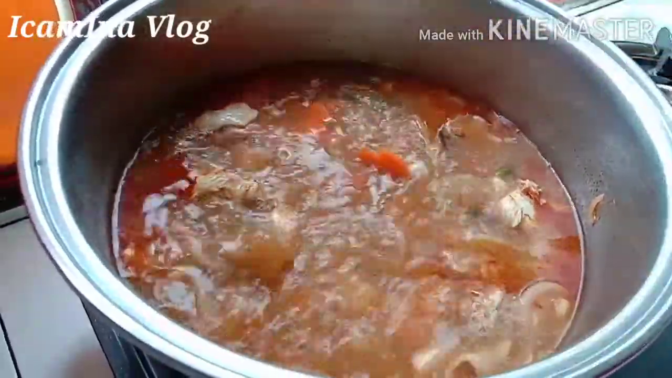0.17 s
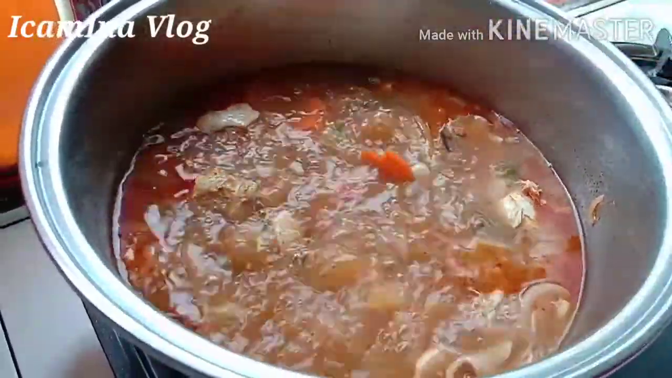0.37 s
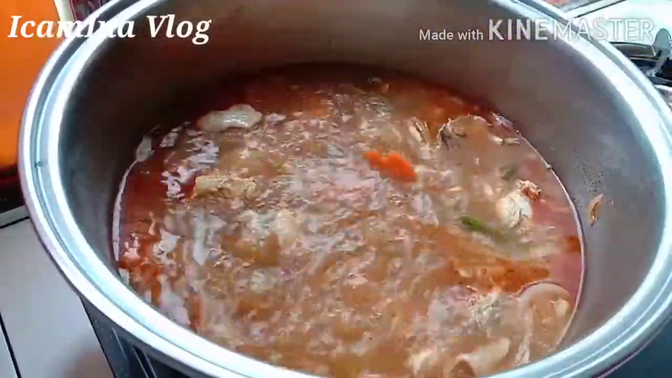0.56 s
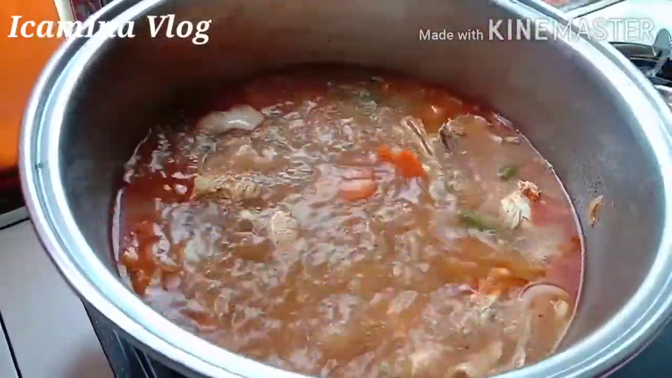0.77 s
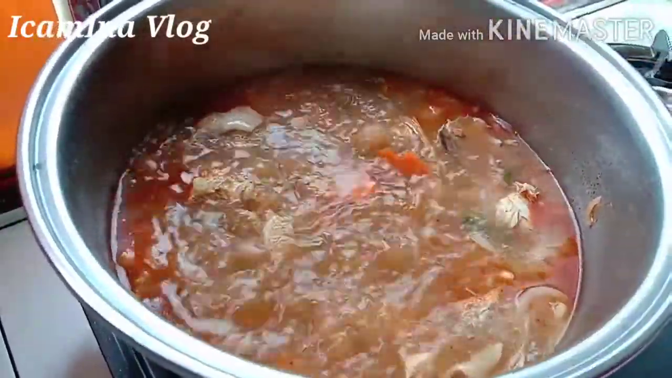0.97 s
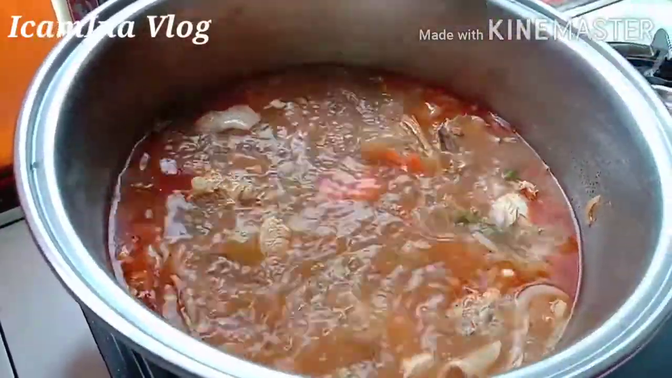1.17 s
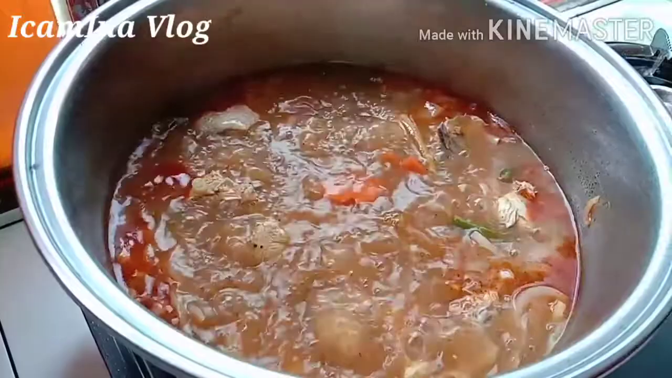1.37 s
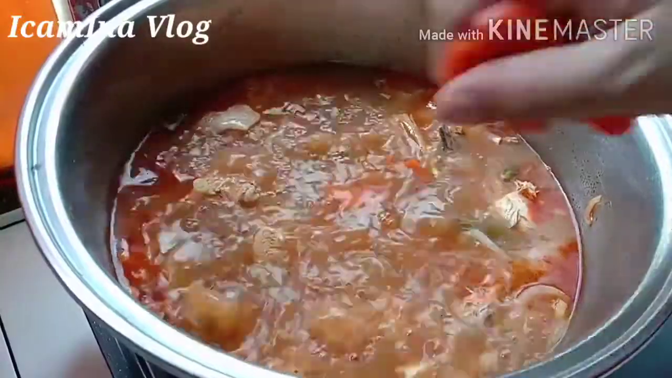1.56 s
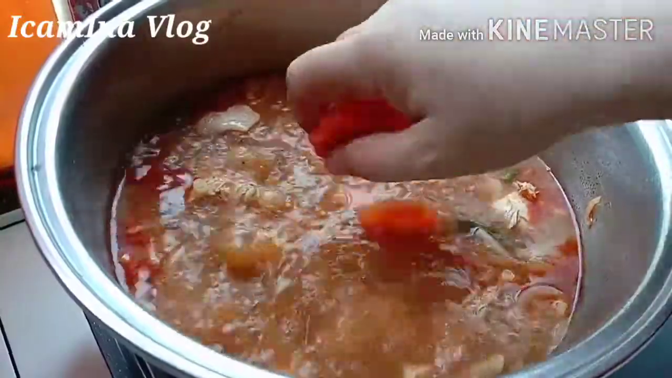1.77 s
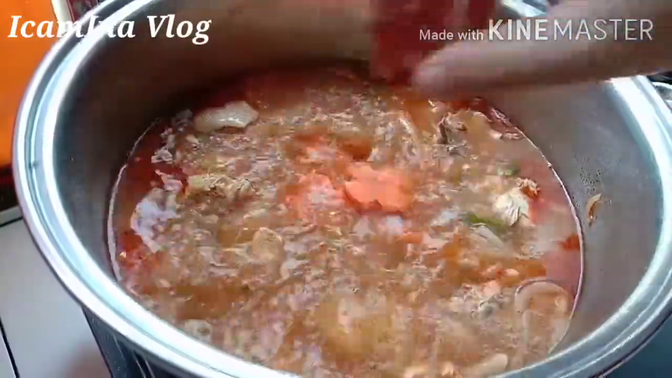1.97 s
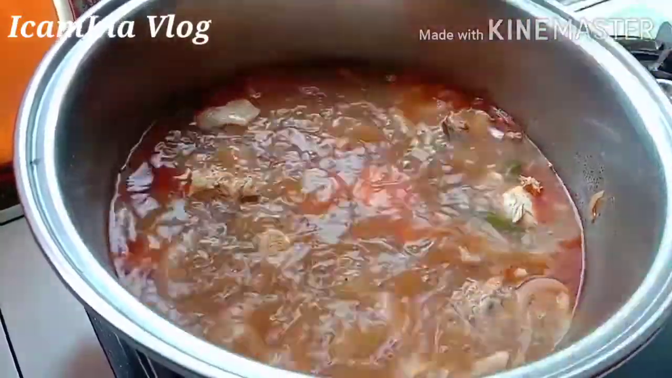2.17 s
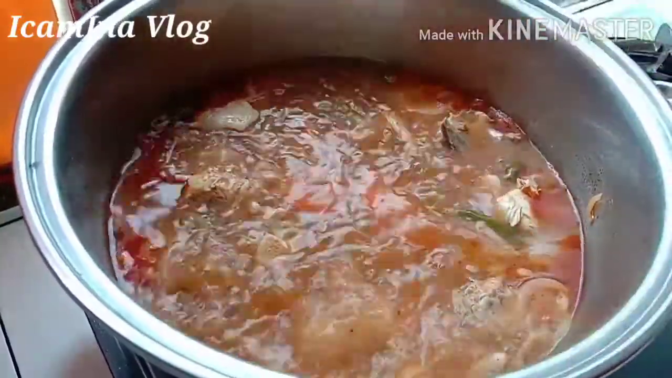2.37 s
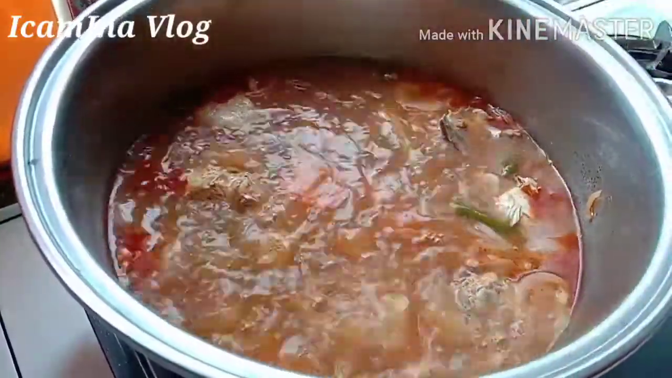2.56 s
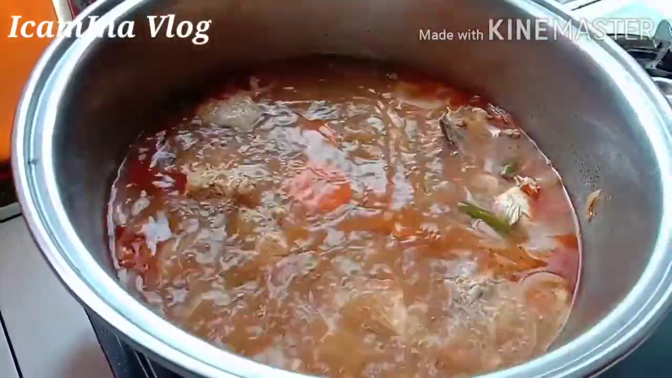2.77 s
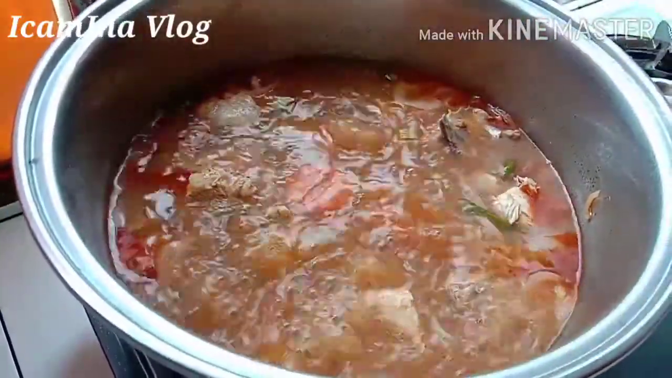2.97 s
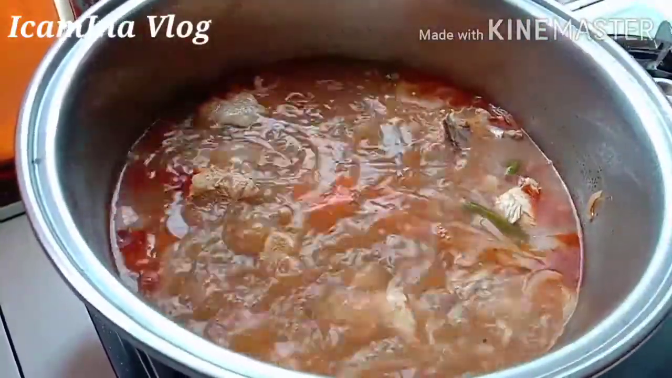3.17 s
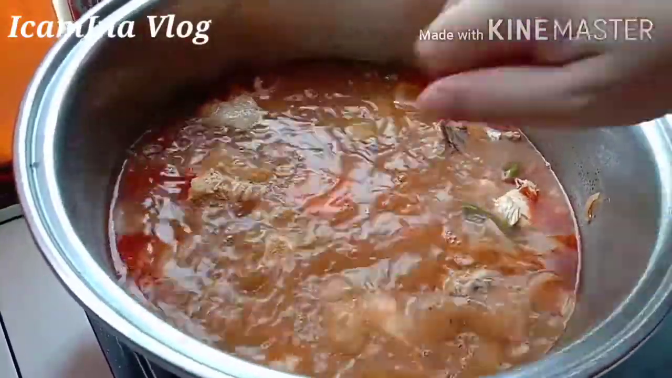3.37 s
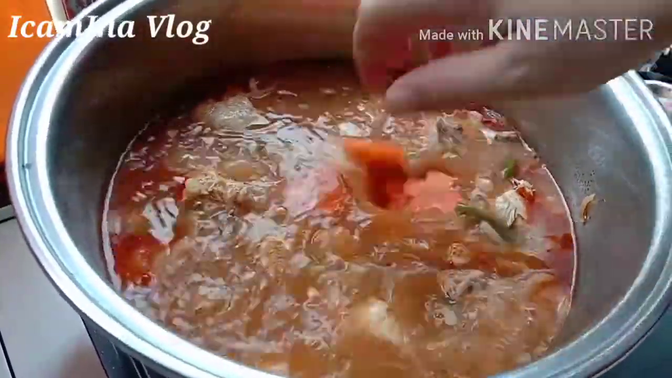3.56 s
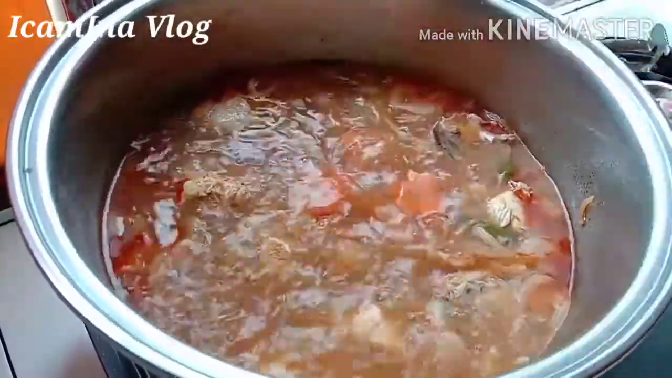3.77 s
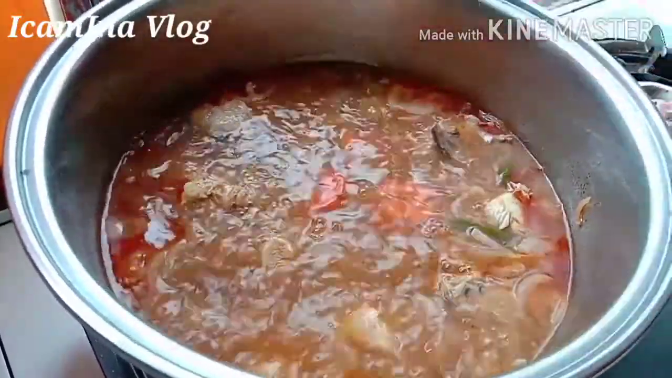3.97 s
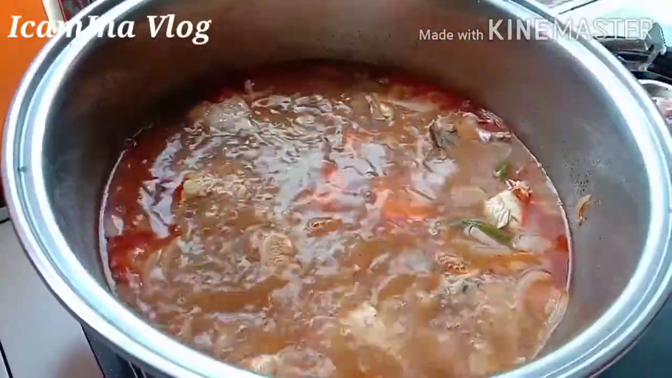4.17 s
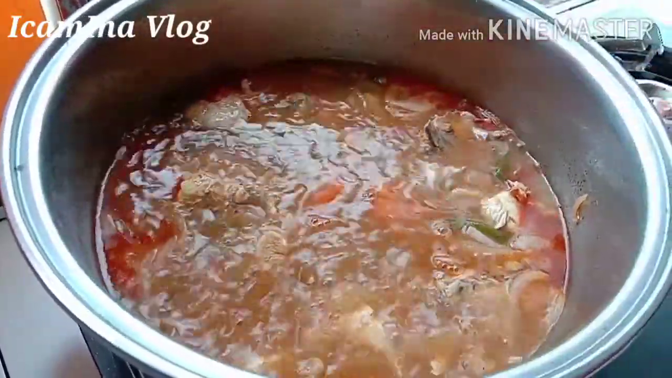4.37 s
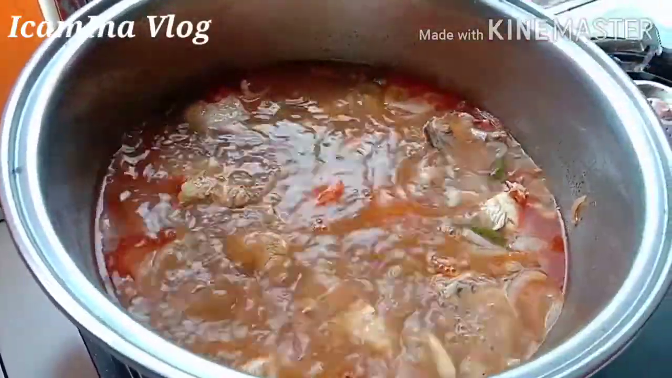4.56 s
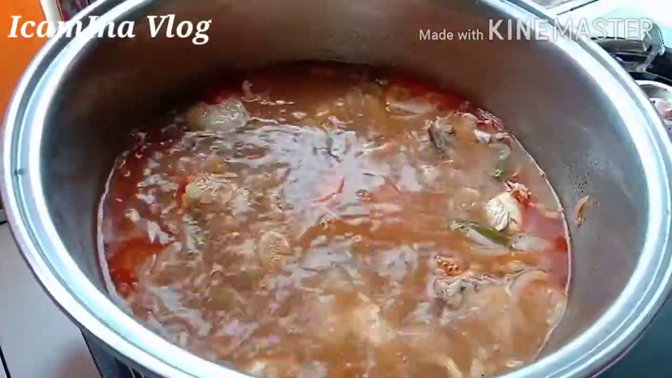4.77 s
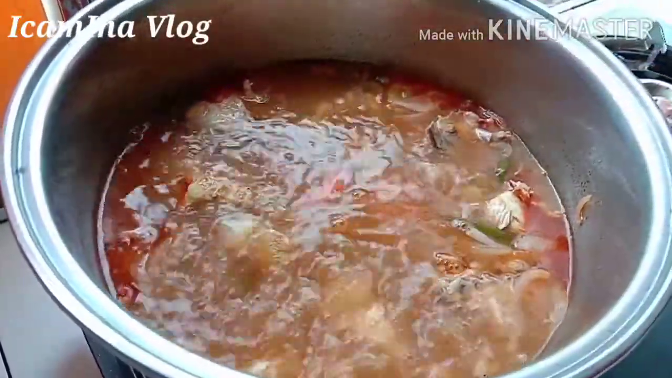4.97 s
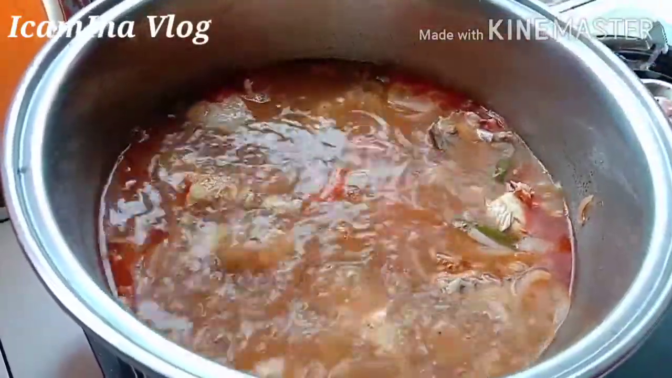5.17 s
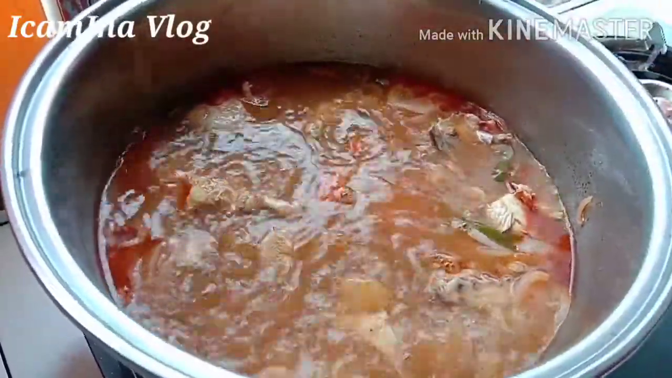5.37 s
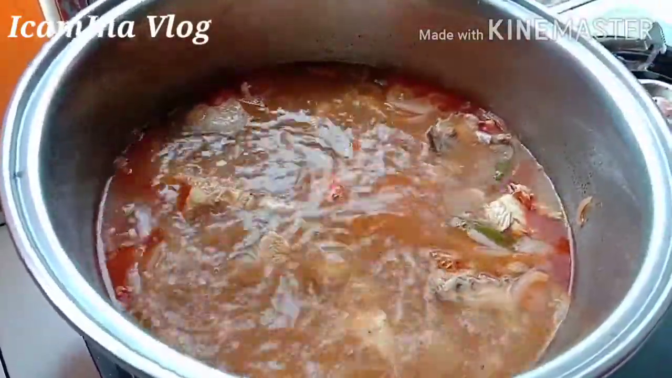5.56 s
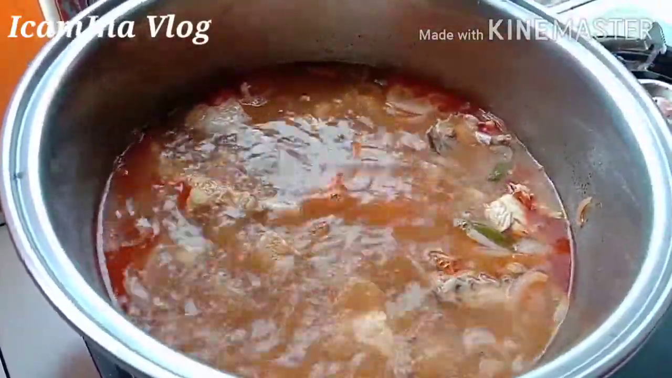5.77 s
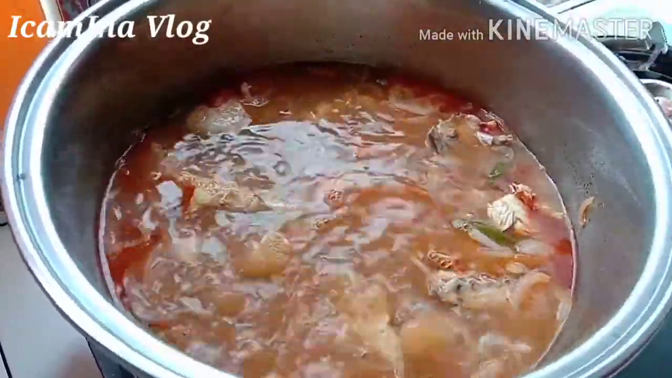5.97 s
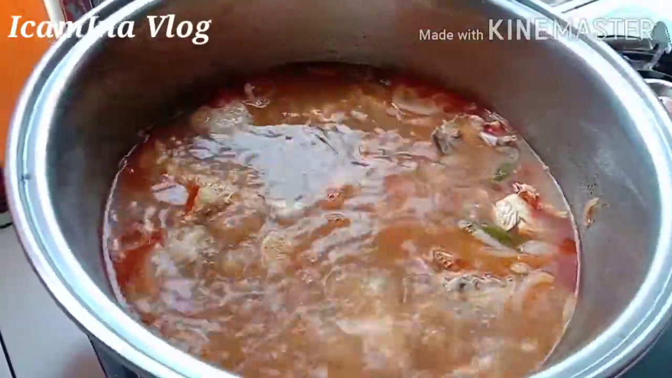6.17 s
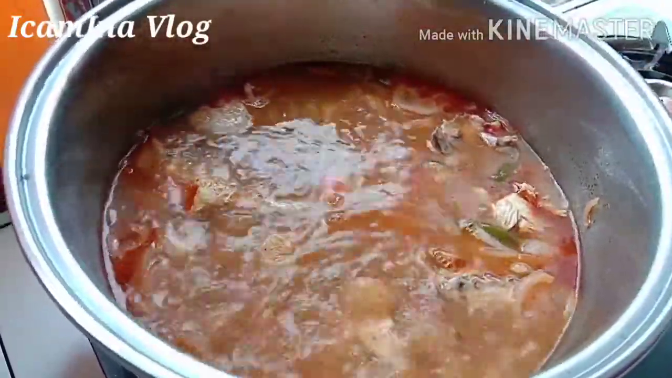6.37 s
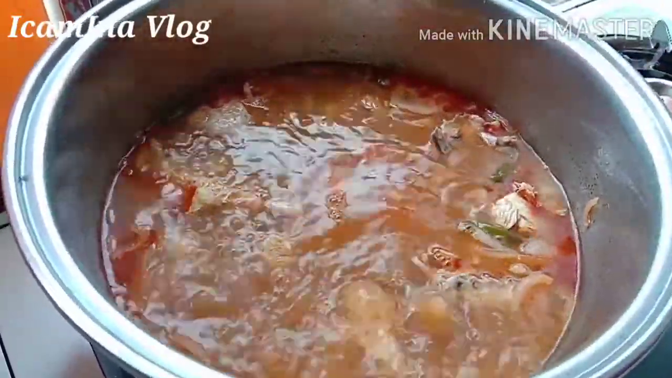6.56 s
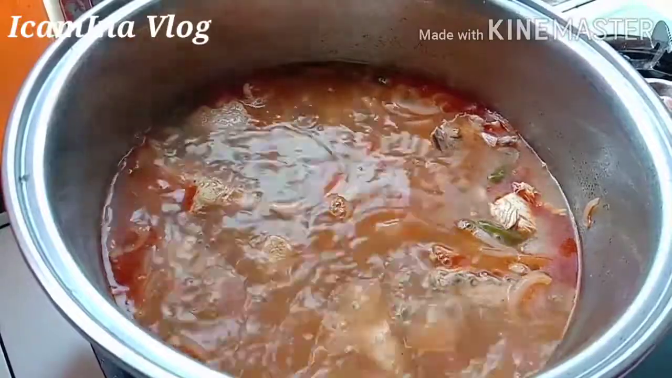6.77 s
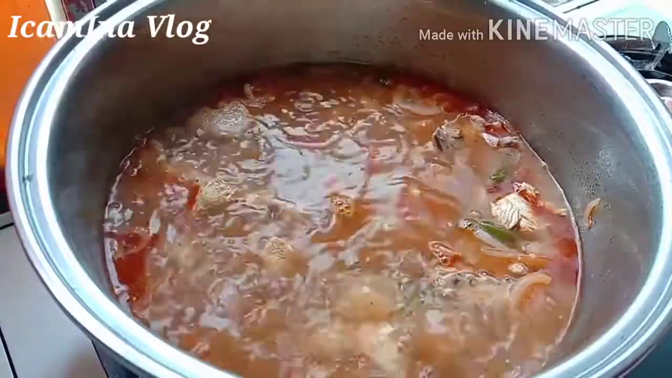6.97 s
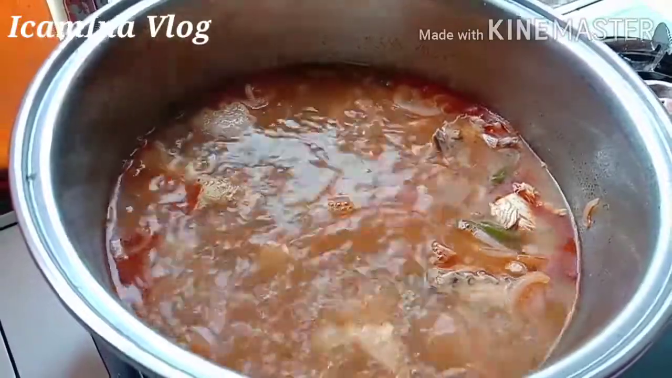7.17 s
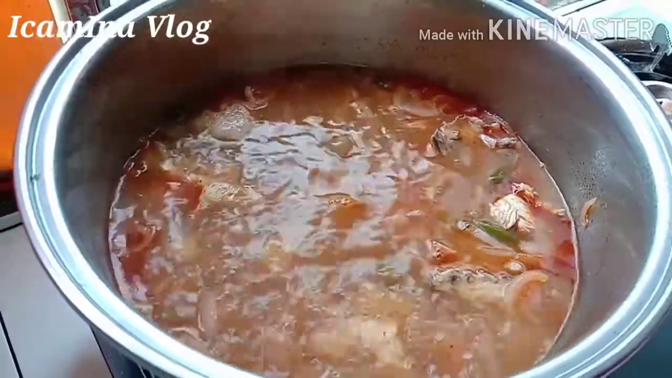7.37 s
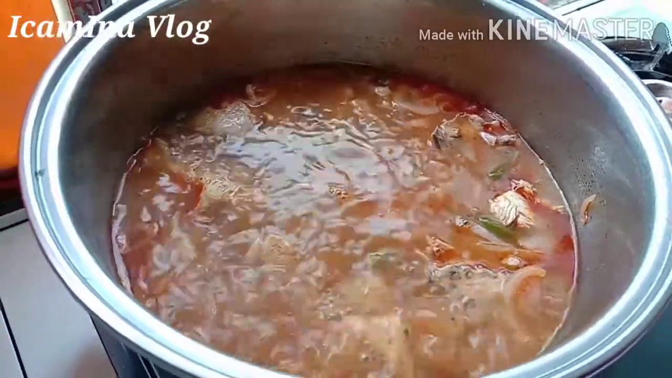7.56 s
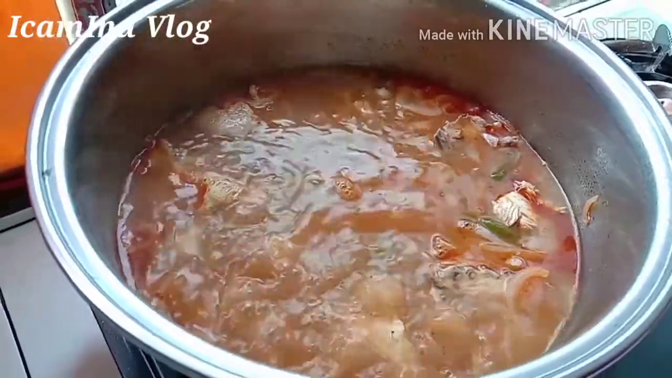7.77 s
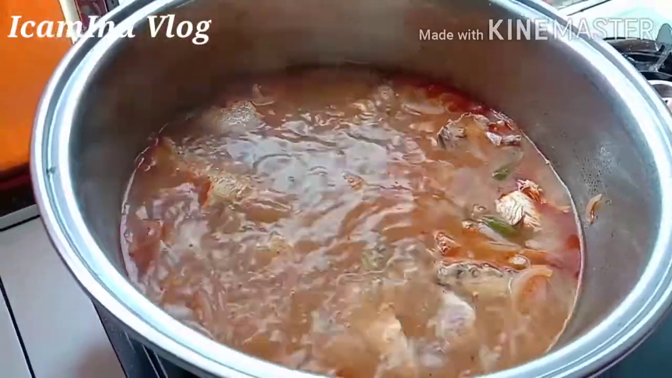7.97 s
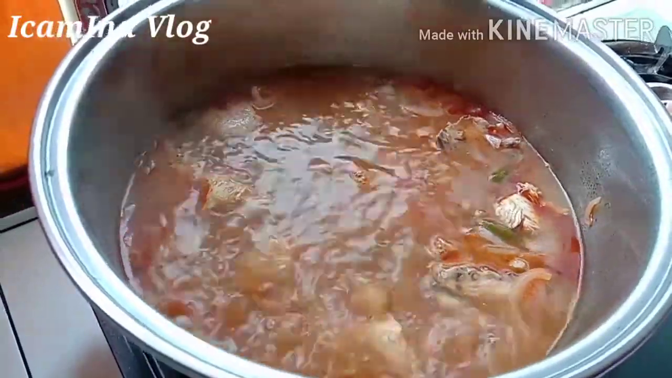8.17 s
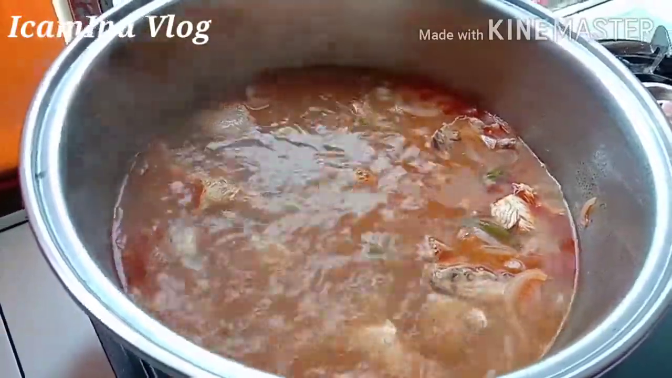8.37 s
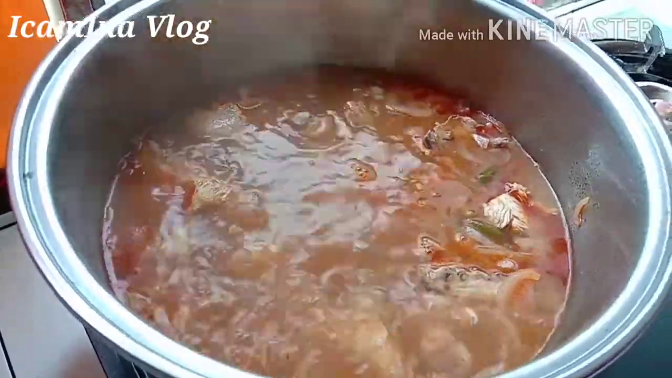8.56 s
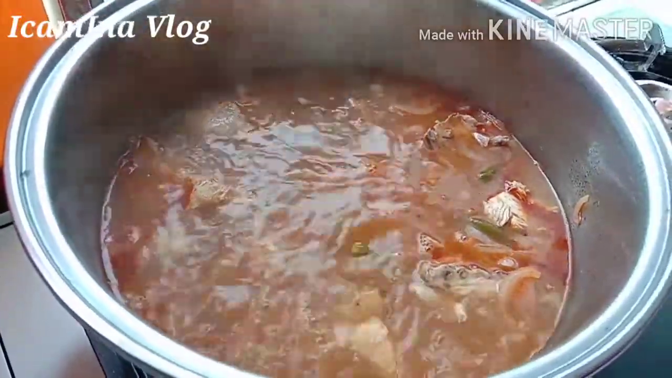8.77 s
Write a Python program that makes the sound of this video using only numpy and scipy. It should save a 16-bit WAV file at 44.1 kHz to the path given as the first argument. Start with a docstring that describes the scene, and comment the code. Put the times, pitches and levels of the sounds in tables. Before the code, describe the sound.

A big steel pot of broth boils without pause, close to the microphone in a small kitchen: low gurgles, a dense midrange simmer and fine crackling fizz. A handful of vegetable slices slaps and plops in, then a smaller one. Later a dish touches the worktop lightly, then lands with a loud hard clunk that rings briefly in the room. A tiny dry rustle comes near the end. Almost mono.

```python
"""Broth on the boil

Broth boils in a steel pot in a small kitchen: steam pockets collapse on the bottom as filtered clicks,
big bubbles gurgle up as rising rings over low noise, and tiny ones fizz and ping at the surface.
Two handfuls of vegetable slices plop in, each a noise slap with a ringing bubble; later, grains rustle briefly.
A dish lands on the worktop, lightly and then heavily: a noise blow, ringing modes and the room's answer.
The sound is almost mono."""
import sys
import numpy as np
from scipy import signal
from scipy.fft import rfft, irfft, next_fast_len
from scipy.io import wavfile
from scipy.ndimage import uniform_filter1d, map_coordinates

SR = 44100
rng = np.random.default_rng(int(sys.argv[2]) if len(sys.argv) > 2 else 0)


def wav_record(signal):
    """Record a signal, one row per channel, as 16-bit PCM in the file named by sys.argv[1]."""
    frames = np.transpose(np.atleast_2d(signal))
    bounded = np.clip(frames, -1, 1)
    # unit amplitude maps onto the largest positive 16-bit level
    quanta = np.round(bounded * 32767).astype(np.int16)
    wavfile.write(sys.argv[1], SR, quanta)


N = 388962  # length in samples

# Boil: slow level moves.
# strength of the collapses on the pot's bottom: start_s, level_db
SEETHE_LEVEL = [(0, -49.5), (2.15, -48.5), (2.7, -48.5), (3.3, -49.5), (3.8, -49), (4.2, -48.5), (5.3, -47),
                (6.7, -47), (8.8, -48.5)]
# surface sizzle, before its overall gain: start_s, level_db
SIZZLE_LEVEL = [(0.0, -57.5), (0.33, -60), (1.81, -59), (2.02, -58), (2.88, -61), (7.02, -60), (7.5, -62),
                (8.55, -59.5)]
# finest fizz, which thins out and returns: start_s, level_db
FIZZ_LEVEL = [(0, -66), (1.7, -63.5), (6.1, -68.5), (7.8, -69), (8.5, -65.5)]
# each handful shifts the fizz for a moment: start_s, change_db
HANDFULS = [(1.87, 2.5), (3.63, -1)]
SETTLE_S = 0.45  # time constant of the return
GURGLE_DB, GURGLE_DB_PER_S = -55.5, 0.11  # level at the start, and its climb

# Boil: spectra and resonances.
# rolling steam bubbles: frequency_hz, relative_db
GURGLE = [(20, -17), (38, -28), (48, -10), (60, -17.5), (90, -6.5), (140, -3.5), (180, -6.5), (320, -4.5),
          (450, -11), (900, -17.5), (2000, -84)]
# collapsing steam pockets: frequency_hz, relative_db
SEETHE = [(100, -32), (300, -22.5), (470, -12), (750, -8.5), (950, -9), (1150, -2), (1500, -5),
          (1850, -4.5), (2200, -10), (3000, -19), (4200, -31), (8000, -56), (16000, -69)]
# films bursting on the surface: frequency_hz, relative_db
SIZZLE = [(1500, -3.5), (3300, -3), (4400, -8), (4900, 3), (5400, 4), (6200, -7), (6550, 4.5), (6950, -3.5),
          (7650, 2), (8200, -15), (9400, -20), (12000, -17), (13900, -17), (15300, -8)]
# finest pinging bubbles: frequency_hz, relative_db
PING_BAND = [(3000, -50), (6000, 2), (7500, -15.5), (9300, 3), (10600, 2), (12000, -2.5), (14000, -32)]
# resonances of the pot and its air: frequency_hz, width_hz, lift_db
POT = [(620.4, 52, 4.5), (850, 35, 1), (1266.6, 100, 11.5), (1731, 34, 5), (1781, 22, 5.5)]

# Steam domes and single bubbles.
# big domes that glug one by one: peak_s, peak_db, pitch_hz
GULPS = [(0.08, -45.5, 106.5), (0.39, -52, 118), (0.46, -52, 111), (1.04, -44, 108), (1.2, -49, 304),
         (1.61, -49, 316), (1.73, -48, 151), (1.74, -53, 311), (1.95, -49, 97), (2.0, -51, 107),
         (2.19, -46, 117), (2.21, -52, 310.6), (2.31, -50.5, 319), (2.33, -48.5, 113), (2.43, -47, 305),
         (2.66, -51, 134), (2.73, -49.5, 320), (2.91, -45, 308.6), (3.06, -52, 316), (3.11, -53.5, 610),
         (3.62, -51, 118), (3.95, -46, 210), (4.44, -52, 140), (4.78, -50, 312), (5.32, -51, 112),
         (6.2, -48.5, 318), (6.44, -49, 308), (6.65, -49, 317), (6.77, -48, 312), (6.89, -50, 307),
         (7.02, -47, 320), (7.1, -45, 308.5), (7.31, -51, 146), (7.39, -48, 208.4), (7.45, -49.5, 315),
         (7.6, -47, 322), (7.73, -46.5, 129), (7.78, -44.5, 310.4), (7.99, -47, 316), (8.24, -48, 220),
         (8.4, -48.5, 111.5), (8.45, -49, 110), (8.5, -49.5, 219)]
# pitches that the lesser domes favour: pitch_hz, level_db, rate_per_s
DOME_TONES = [(112.3, -52.5, 1.5), (145, -56, 1.3), (208, -55.5, 1.5), (309.2, -54.5, 2.5),
              (605, -54, 0.96), (810, -53.5, 0.63)]
DOME_SPREAD_DB, DOME_DETUNE = 1.5, 0.02  # scatter of level, and of pitch as a fraction
# single bubbles that burst near the microphone: start_s, peak_db, pitch_hz
BURSTS = [(0.5235, -52, 8200), (0.5967, -36, 9900), (0.7218, -39, 7460), (0.917, -43, 7900),
          (1.364, -39, 10000), (1.6318, -37, 9910), (2.3665, -35, 9400), (2.6396, -37, 9700),
          (3.3139, -53, 6580), (3.992, -37, 9100), (4.3914, -36, 7500), (5.0694, -40, 9900),
          (5.772, -41, 9900), (6.162, -43, 7600), (8.1535, -37, 7170), (8.313, -39, 9600)]

# Vegetable slices. slices, and drops falling back after them, slap the broth: start_s, slap_db (before a shared
# lift), plop_db (relative), pitch_hz (trapped bubble), treble_edge_hz
SPLASHES = [(1.8699, -34, -5, 3590, 5500), (1.8725, -30, -9, 4560, 15000), (1.93, -36, -13, 4800, 15000),
            (1.945, -37, -1, 4560, 8000), (1.954, -37, -5, 4450, 7000), (2.0373, -28, -0.5, 3320, 15000),
            (2.0522, -35, -13, 6250, 8000), (2.3645, -41.5, -7, 5200, 14000),
            (3.631, -32.5, -7, 3840, 6000), (3.6378, -32, -2, 9400, 15000), (3.6578, -34, -8, 6800, 9500),
            (3.667, -34.5, 3, 5420, 9000), (4.022, -50, -4, 3950, 9000)]
# the slap on the surface: frequency_hz, relative_db
SLAP = [(300, -32), (2500, -47), (3400, -11), (4200, -18), (5100, 2.5), (6800, 5), (8200, 2), (9600, 0.5),
        (13000, -15), (15300, 7)]
# the steel wall's bright resonances: frequency_hz, width_hz, lift_db
WALL = [(3340, 180, 18), (3920, 180, 17), (4770, 800, 15.5)]
# the plop inside the pot: frequency_hz, relative_db
PLOP = [(100, -16), (400, -16), (800, -11), (1200, -11.5), (1900, -4), (2700, -10.5), (3500, -22),
        (5000, -14), (9000, -33), (16000, -58)]
TRAPPED_DB, TRAPPED_SHARE = -14, 0.55  # the trapped bubble follows only a share of the slap's dB

# Dish on the worktop.
# contacts: start_s, level_db (relative), room_db (relative), metal_db (relative), treble_edge_hz
KNOCKS = [(5.6776, -29, -7.5, -23.5, 3180), (5.805, -34.5, -10, -41, 1800), (5.837, -17, -1.5, -18.5, 7000)]
# the dull blow: frequency_hz, relative_db
DISH = [(40, -76), (62, -61), (95, -4.5), (200, -15.5), (400, -8), (560, -10), (800, -2.5), (1160, 1),
        (1500, -5), (1950, -5), (2600, -15), (3500, -30), (4400, -58), (12000, -77)]
# ringing modes heard after a knock, the low ones from the room: frequency_hz, relative_db, t60_s
KNOCK_MODES = [(206.5, -11.5, 0.59), (305, -13, 0.56), (363, -14, 0.75), (712, -8, 0.38), (850, -15, 0.67),
               (918, -11, 0.36), (1138, -8, 0.47), (1141, 1.5, 0.35), (1148, -1, 0.37), (1226, -1.5, 0.64),
               (1281, -1, 0.77), (1342, -7.5, 0.98), (1430, -8.5, 0.62), (1943, -7, 0.41),
               (2430, -25, 0.27), (2622, -22, .4)]
# thin metal that the knocks set ringing: frequency_hz, relative_db, t60_s
METAL = [(4940, -16.5, 0.52), (5360, -25, 0.45), (7090, -24, .25), (7504, 2, 0.37), (10230, -37, 0.41),
         (11180, -22, 0.24)]
CHATTER_S, CHATTER_DB, CHATTER_LOSS_DB = 0.013, 14.5, 8  # gap, first rebound, loss at each further one

# Small sounds beside the pot.
# short rustles: start_s, level_db (before a shared lift), resonance_hz
RUSTLES = [(8.612, -33, 5700), (8.649, -39, 5500), (8.673, -41, 4900), (8.686, -41, 5600),
           (8.731, -37.5, 5300), (8.743, -33, 5050)]
# crinkling grains: frequency_hz, relative_db
CRINKLE = [(200, -37), (800, -24), (1250, 5.5), (2200, -8.5), (3800, -10.5), (4700, -16), (5300, 1),
           (6200, -18), (7200, -6), (8300, -14.5), (9800, -11), (13000, -31), (15300, -20)]
RUSTLE_S = 0.018  # the bell-shaped swell peaks halfway through this
# air of the passing hand nudges the microphone: centre_s, level_db, length_s
PUFF = (1.646, -52, 0.036)

# Background and room.
# even hiss: frequency_hz, relative_db
HISS = [(4000, -21), (8200, -3), (9500, -11.5), (11000, -16), (12000, -22), (13500, -4), (14500, -6),
        (15300, 14)]
HISS_DB = -73.5
# the kitchen's decay: frequency_hz, t60_s
KITCHEN = [(100, 0.43), (300, 0.57), (700, 0.47), (1300, 0.7), (2500, 0.5), (10000, 0.31)]
# standing waves of the kitchen: frequency_hz, width_hz, lift_db
STANDING = [(103.1, 16.6, 4.5), (219.6, 3.5, 8), (314.6, 8.4, 9), (379, 24, 4)]
# level of the faint side signal that gives a little width: frequency_hz, side_db
WIDTH = [(30, -2), (70, -27), (130, -42.5), (300, -35), (900, -30.5), (1300, -47.5), (2400, -32.5),
         (4400, -29.5), (8100, -51), (13000, -18), (15000, -19)]
TOP_HZ = 15520  # nothing sounds above this


def boil(sizzle_gain_db=1.5):
    """The voices of the boil drift as the broth heats; each handful disturbs the fizz, and it settles again."""
    t = np.arange(N) / SR
    stir_db = sum(db * (t > s) * np.exp(-np.abs(t - s) / SETTLE_S) for s, db in HANDFULS)
    gurgle_db = GURGLE_DB + GURGLE_DB_PER_S * t
    seethe_db = np.interp(t, *np.transpose(SEETHE_LEVEL))
    sizzle_db = np.interp(t, *np.transpose(SIZZLE_LEVEL)) + sizzle_gain_db + 0.79 * wobble(14)
    fizz_db = np.interp(t, *np.transpose(FIZZ_LEVEL)) + stir_db
    low = amp(gurgle_db) * gurgle() + amp(seethe_db) * seethe()
    high = amp(sizzle_db) * sizzle() + amp(fizz_db) * fizz()
    return low + high


def seethe():
    """Countless steam pockets collapse on the hot bottom and ring the pot; small bubbles blip at the surface."""
    collapses = unit(clicks(per_second=5000, spread_db=1.5, length=N)) * amp(0.99 * wobble(15))
    rush = patchy(colour(collapses, SEETHE, POT), depth_db=1.1)
    blips = bubbles(count=380, pitch_hz=1860, octaves=0.45, cycles=119, rise=0.088, spread_db=0.0)
    blips = amp(-8.0) * unit(colour(blips, SEETHE))
    return unit(in_room(rush + blips, wet_db=-10))


def gurgle():
    """Steam bubbles roll through the broth and wake the room's low resonances."""
    blubs = bubbles(count=1800, pitch_hz=211.1, octaves=0.776, cycles=30.0, rise=0.36, spread_db=4.5)
    blubs = unit(colour(blubs, GURGLE))
    churn = amp(-3.5) * unit(colour(rng.standard_normal(N), GURGLE))
    flat = [(100, 0)]
    return unit(colour(blubs + churn, flat, STANDING))


def sizzle():
    """Films burst on the surface: a fine crackle, and swarms of tiny ringing bubbles."""
    crackle = colour(clicks(per_second=7000, spread_db=7.0, length=N), SIZZLE)
    crackle = patchy(crackle, depth_db=3.5)
    beads = bubbles(count=3000, pitch_hz=5790, octaves=0.303, cycles=253, rise=0.055, spread_db=-1.0)
    beads = amp(-3.5) * unit(colour(beads, SIZZLE))
    return unit(in_room(crackle + beads, wet_db=-10.0))


def fizz():
    """The finest bubbles ping in flurries."""
    pings = bubbles(count=4000, pitch_hz=9200, octaves=0.12, cycles=26, rise=0.034, spread_db=7.5)
    flurries = pings * amp(2.3 * wobble(18))
    return unit(in_room(colour(flurries, PING_BAND), wet_db=-2.5))


def gulps(swell_s=0.027, rise=0.014, waver=0.023):
    """Each big dome of steam swells, rings briefly at a wavering pitch and fades."""
    out, age = np.zeros(N), np.arange(SR // 4) / SR / swell_s
    envelope = (age * np.exp(1 - age)) ** 2  # peaks at age 1
    shape_change = waver * wobble(60)
    for s, db, hz in list(GULPS) + domes():
        start = min(int(s * SR), N - len(age))
        pitch = hz * (1 + rise * (age - 1) + shape_change[start:start + len(age)])
        ring = np.sin(2 * np.pi * np.cumsum(pitch) / SR)
        add(out, max(s - swell_s, 0), amp(db) * envelope * ring)
    return out


def domes():
    """Lesser domes of steam rise at random, each near a favoured pitch: rows of peak_s, peak_db, pitch_hz."""
    rows = []
    for hz, db, per_second in DOME_TONES:
        scatter = rng.standard_normal((64, 2))
        for s, (force, radius) in zip(chance_times(per_second), scatter):
            rows.append((s, db + DOME_SPREAD_DB * force, hz * (1 + DOME_DETUNE * radius)))
    return rows


def bursts(cycles=20, rise=0.04):
    """Now and then a single tiny bubble pings close to the microphone."""
    out, t = np.zeros(N), np.arange(SR // 100) / SR
    for s, db, hz in BURSTS:
        ring = ping(t * hz / cycles, cycles, rise)
        add(out, s, amp(db) * ring / np.abs(ring).max())
    return in_room(out, wet_db=-19)


def splashes(slap_t60=0.011, spray_t60=0.063, spray_db=-17, plop_t60=0.16, cycles=50, rise=0.084):
    """Each slice or falling drop slaps the surface, traps a ringing bubble, throws a little spray and plops
    inside the pot."""
    out, t = np.zeros(N), np.arange(SR // 4) / SR
    for s, db, plop_db, hz, edge_hz in SPLASHES:
        slap = rng.standard_normal(len(t)) * amp(-60 * t / slap_t60) * (1 - np.exp(-t / 0.00078))
        droplets = unit(clicks(per_second=1500, spread_db=3, length=len(t)))
        spray = droplets * amp(spray_db - 60 * t / spray_t60)
        wet = dull(colour(slap + spray, SLAP, WALL), edge_hz)
        plop_noise = rng.standard_normal(len(t)) * amp(-60 * t / plop_t60)
        plop = amp(plop_db) * colour(plop_noise, PLOP, POT)
        bubble = amp(TRAPPED_DB + TRAPPED_SHARE * db) * ping(t * hz / cycles, cycles, rise)
        add(out, s, amp(db + 2.5) * (wet + plop) + bubble)
    return in_room(out, wet_db=-9.5)


def knocks(blow_t60=0.05, shiver_db=3, buzz_db=2, metal_rise_s=0.016):
    """A dull, chattering blow, ringing modes and a thin, shivering metal ring; walls draw the blow out."""
    out, t = np.zeros(N), np.arange(SR) / SR
    for s, db, room_db, metal_db, edge_hz in KNOCKS:
        blow = rng.standard_normal(len(t)) * amp(2.5 - 60 * t / blow_t60)
        blow[0] += amp(12)  # the first contact is one sharp push
        for k in range(3):  # the dish chatters as it lands
            blow[int((k + 1) * CHATTER_S * SR)] += amp(CHATTER_DB - CHATTER_LOSS_DB * k)
        walls = amp(room_db) * tail(len(t)) * (1 - np.exp(-t / 0.02))
        thud = amp(11.5) * dull(colour(blow + walls, DISH, STANDING), edge_hz)
        ringing = amp(-8.5) * ring_modes(KNOCK_MODES, t) * (1 - np.exp(-t / 0.00068))
        shiver = amp(shiver_db * wobble(80.0)[:len(t)] + buzz_db * wobble(900)[:len(t)])
        metal = amp(metal_db + 2.5) * shiver * ring_modes(METAL, t) * (1 - np.exp(-t / metal_rise_s))
        add(out, s, amp(db) * (thud + ringing + metal))
    return out


def ring_modes(modes, t):
    """Resonances set off by a knock: a sum of fading sines, each with a random phase."""
    total = np.zeros(len(t))
    for hz, db, t60 in modes:
        total += amp(db - 60 * t / t60) * np.sin(2 * np.pi * (hz * t + rng.random()))
    return total


def rustles(width_hz=600, lift_db=7):
    """Brief bursts of crinkling grains, each with its own bright resonance."""
    out, t = np.zeros(N), np.arange(SR // 10) / SR
    swell = np.exp(-(2 * t / RUSTLE_S - 1) ** 2)
    for s, db, hz in RUSTLES:
        grains = unit(clicks(per_second=1100, spread_db=4.5, length=len(t))) * swell
        add(out, s, amp(db) * colour(grains, CRINKLE, [(hz, width_hz, lift_db)]))
    return in_room(amp(3.0) * out, wet_db=-9.0)


def puff():
    """A soft low push of air: deep noise under a bell-shaped swell."""
    s, db, length = PUFF
    spectrum = [(25, -21), (55, -12), (73, 11), (100, -12), (250, -55), (1000, -100)]
    air = unit(colour(rng.standard_normal(N), spectrum))
    return amp(db) * air * np.exp(-((np.arange(N) / SR - s) / length) ** 2)


def hiss():
    """A fine, even hiss of filtered noise lies under the finest bubbles."""
    return amp(HISS_DB) * unit(colour(rng.standard_normal(N), HISS))


def in_room(x, wet_db, count=12):
    """A sound with its reverberation, which changes as the source wanders over the surface."""
    place = np.arange(N) / N * (count - 1)
    wet = np.zeros(N)
    for k in range(count):
        echo = tail(SR // 2)
        share = np.sqrt(np.maximum(1 - np.abs(place - k), 0))  # equal-power crossfade between places
        near = np.flatnonzero(share)
        add(wet, near[0] / SR, signal.fftconvolve((x * share)[near], echo / np.linalg.norm(echo)))
    return x + amp(wet_db) * wet


def tail(length):
    """The kitchen's diffuse answer: noise that dies at its own speed in each band."""
    hz, t, z = signal.stft(rng.standard_normal(length), SR, nperseg=256)
    decay = amp(-60 * t / along(KITCHEN, hz)[:, None])
    return signal.istft(z * decay, SR, nperseg=256)[1][:length]


def bubbles(count, pitch_hz, octaves, cycles, rise, spread_db):
    """Bubbles of scattered radius and force ring at random times."""
    when = rng.integers(0, N, count)
    radius, force = np.clip(rng.standard_normal((2, count, 1)), -2.3, 2.3)
    hz = pitch_hz * 2 ** (octaves * radius)
    n = np.arange(int(cycles * SR / hz.min()))
    rings = amp(spread_db * force) * ping(n / SR * hz / cycles, cycles, rise)
    return unit(np.bincount((when[:, None] + n).ravel(), rings.ravel(), N)[:N])


def ping(age, cycles, rise):
    """One bubble: a soft start, then a ring of rising pitch that has faded by 60 dB at age 1."""
    onset = 1 - np.exp(-(age / 0.08) ** 2)
    return np.sin(2 * np.pi * cycles * age * (1 + rise * age / 2)) * 1e-3 ** age * onset


def clicks(per_second, spread_db, length):
    """Random impulses of scattered size and either sign."""
    chance, size, sign = rng.random(length), rng.standard_normal(length), rng.choice([-1, 1], length)
    return (chance < per_second / SR) * sign * amp(spread_db * np.minimum(size, 2.5))


def chance_times(per_second):
    """Random moments, one in each slot of the mean interval."""
    slots = np.arange(64) + rng.random(64)
    return slots[slots < per_second * (N - 1) / SR] / per_second


def patchy(x, depth_db, size=1024):
    """Swarms of like-sized bubbles come and go, so narrow bands swell and fade on their own."""
    z = signal.stft(x, nperseg=size)[2]
    field = uniform_filter1d(rng.standard_normal(z.shape), size=9, axis=0)  # smooth over frequency
    field = uniform_filter1d(field, size=9, axis=1)  # smooth over time
    return unit(signal.istft(z * amp(depth_db * unit(field)), nperseg=size)[1][:N])


def colour(x, spectrum, resonances=(), size=16384):
    """Causal minimum-phase filter: a broad spectrum, lifted at each resonance."""
    hz = np.fft.rfftfreq(size, 1 / SR)
    db = along(spectrum, hz)
    for centre, width, lift in resonances:
        db = db + lift / (1 + (2 * (hz - centre) / width) ** 2)
    cepstrum = irfft(np.log(amp(db)))
    cepstrum[1:size // 2] *= 2  # folding the cepstrum forward makes the filter causal
    cepstrum[size // 2 + 1:] = 0
    return signal.fftconvolve(x, irfft(np.exp(rfft(cepstrum))))[:len(x)]


def dull(x, edge_hz):
    """A softer contact loses the treble above its edge."""
    return signal.sosfilt(signal.butter(2, min(edge_hz, SR / 2 - 1), fs=SR, output="sos"), x)


def wobble(rate):
    """A smooth random curve, rate knots a second."""
    return map_coordinates(rng.standard_normal(int(N * rate / SR) + 4), [np.arange(N) * rate / SR])


def along(points, hz):
    """Rows of frequency_hz and value, read on a log frequency axis."""
    f, v = np.transpose(points)
    return np.interp(np.log(hz + 1), np.log(f + 1), v)


def add(track, s, sound):
    """Mix a sound into a track at s seconds."""
    start = int(s * SR)
    track[start:start + len(sound)] += sound[:len(track) - start]


def amp(db):
    """Decibels to a linear gain."""
    return 10 ** (np.asarray(db) / 20)


def unit(x):
    """Scale to an RMS of 1."""
    return x / np.sqrt(np.mean(x ** 2) + 1e-20)


def scene(knock_side_db=-10):
    """Nearly mono: a faint, filtered, noise-smeared copy is added left and subtracted right, weaker for knocks."""
    pot = boil() + gulps() + bursts() + splashes() + rustles() + puff() + hiss()
    dish = knocks()
    smear = tail(SR // 10)
    smeared = signal.fftconvolve(pot + amp(knock_side_db) * dish, smear / np.linalg.norm(smear))[:N]
    side = colour(smeared, WIDTH)
    return np.array([pot + dish + side, pot + dish - side])


def record(dry):
    """A steep band limit removes everything from TOP_HZ up."""
    size = next_fast_len(N + SR // 2)
    passband = np.fft.rfftfreq(size, 1 / SR) < TOP_HZ
    return irfft(rfft(dry, size) * passband, size)[:, :N]


dry = scene()
out = record(dry)
wav_record(out)
```